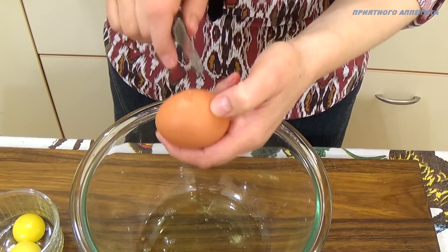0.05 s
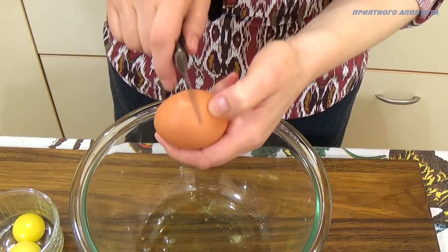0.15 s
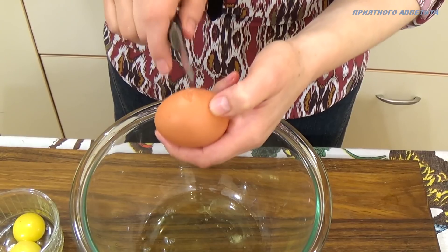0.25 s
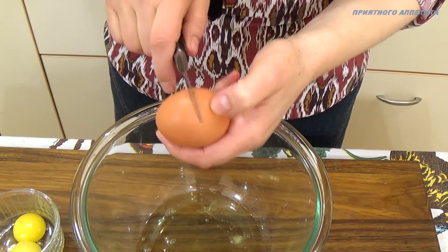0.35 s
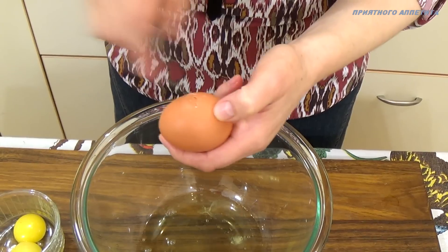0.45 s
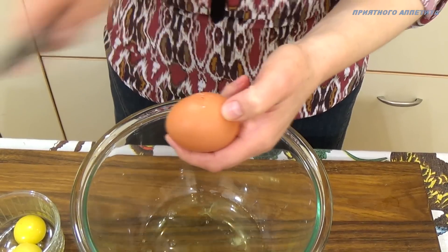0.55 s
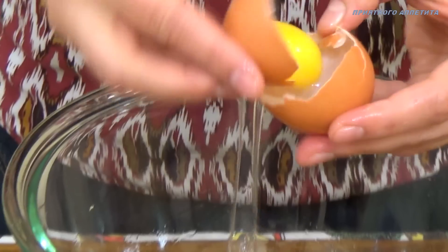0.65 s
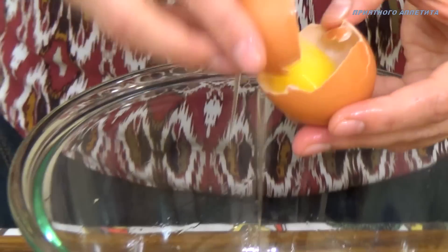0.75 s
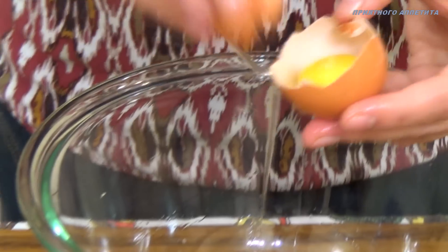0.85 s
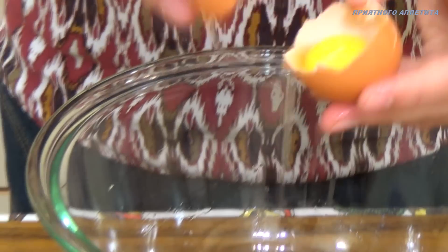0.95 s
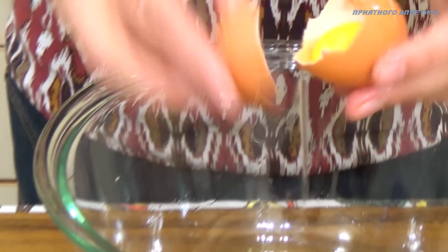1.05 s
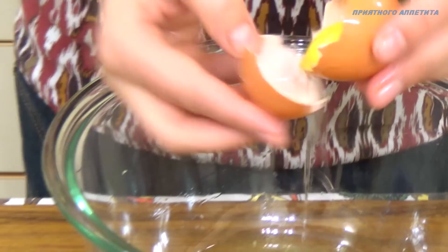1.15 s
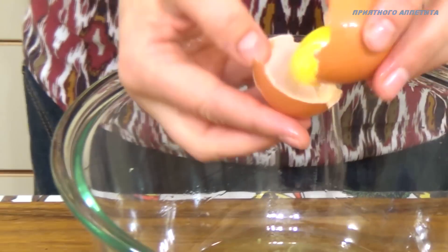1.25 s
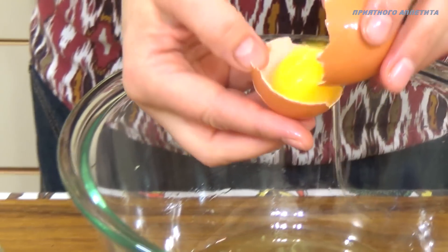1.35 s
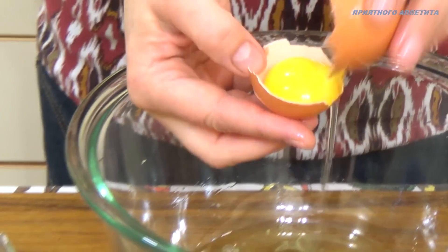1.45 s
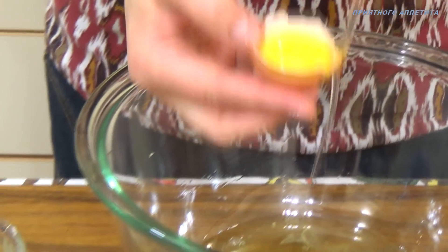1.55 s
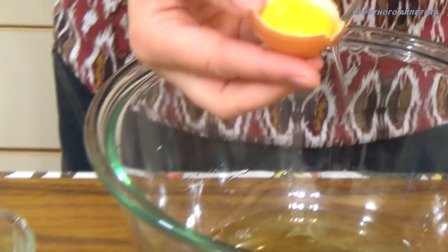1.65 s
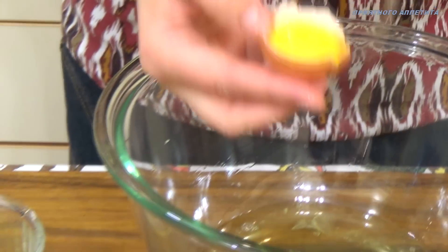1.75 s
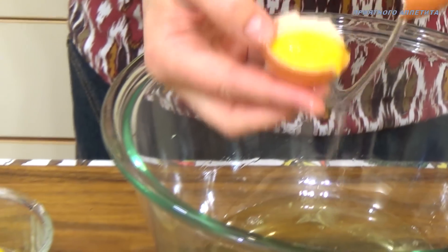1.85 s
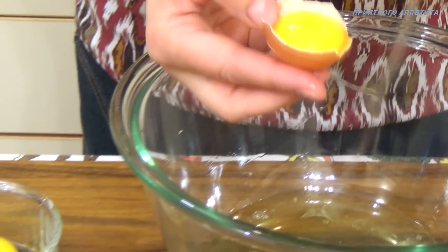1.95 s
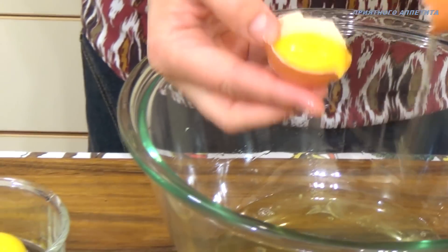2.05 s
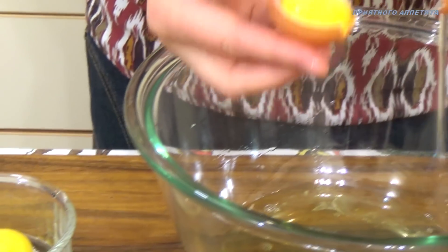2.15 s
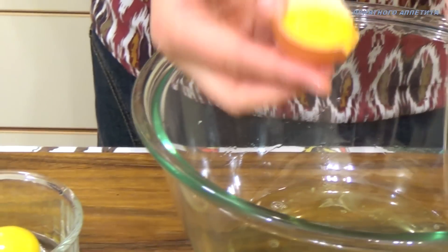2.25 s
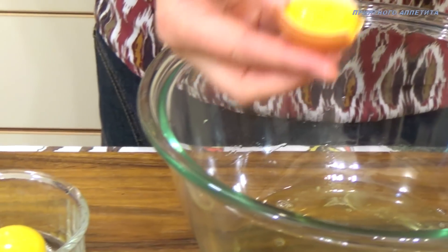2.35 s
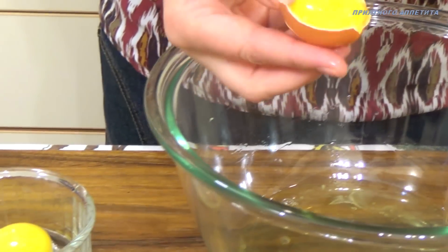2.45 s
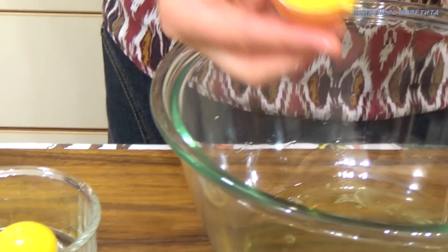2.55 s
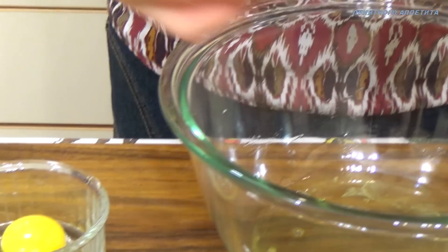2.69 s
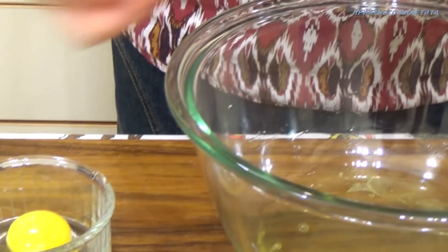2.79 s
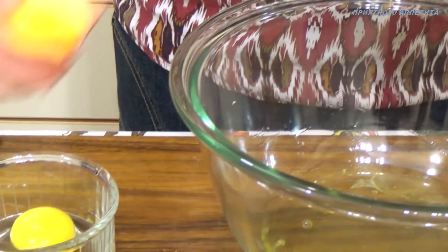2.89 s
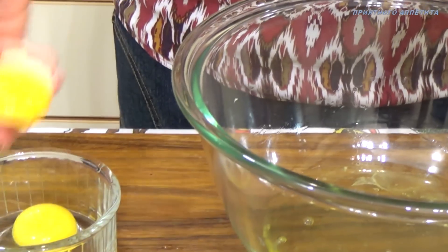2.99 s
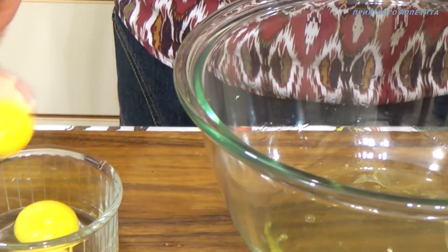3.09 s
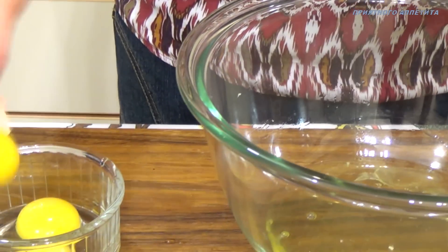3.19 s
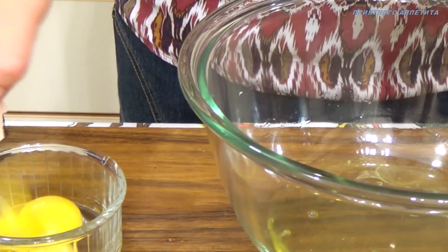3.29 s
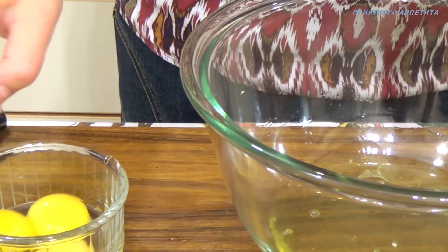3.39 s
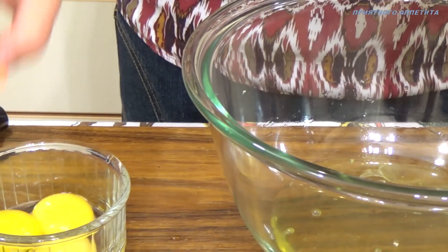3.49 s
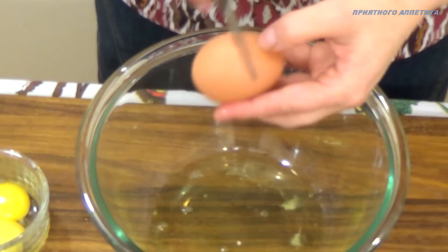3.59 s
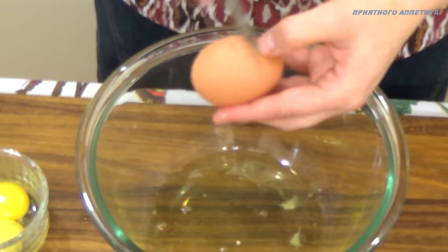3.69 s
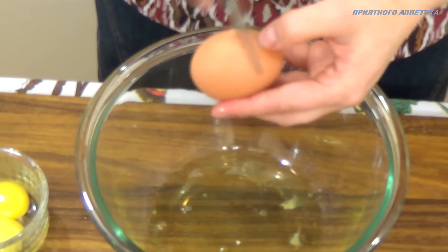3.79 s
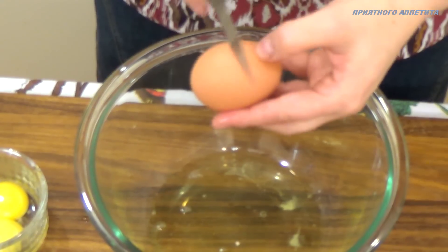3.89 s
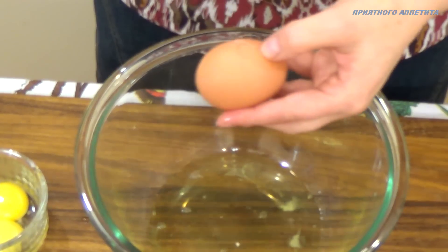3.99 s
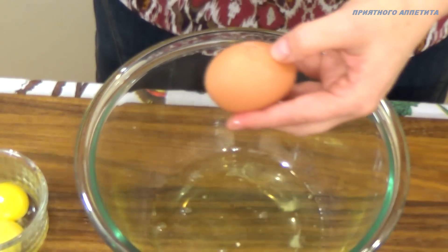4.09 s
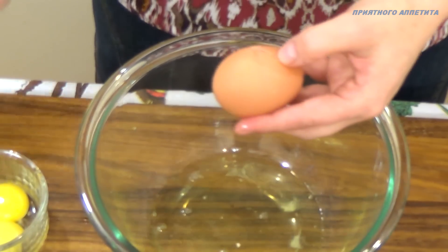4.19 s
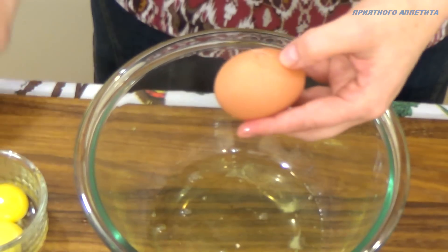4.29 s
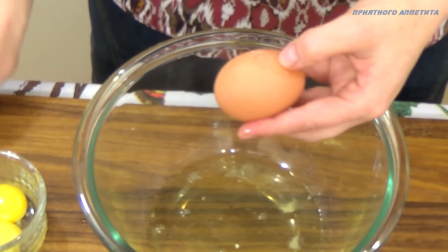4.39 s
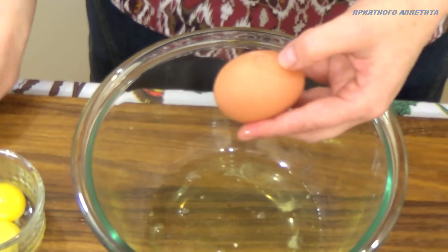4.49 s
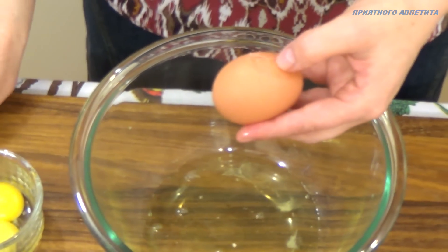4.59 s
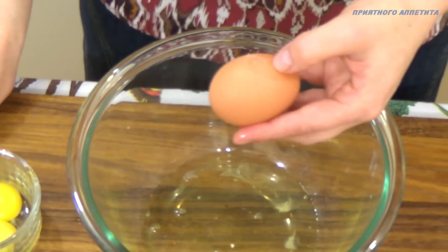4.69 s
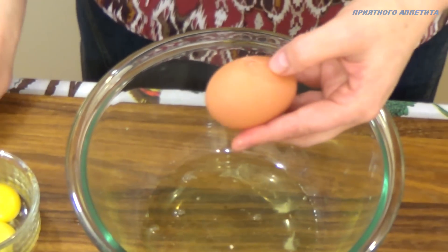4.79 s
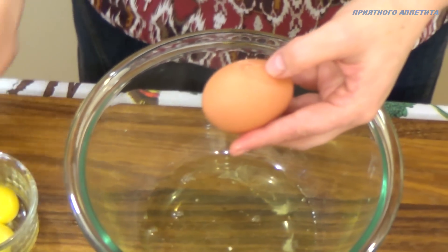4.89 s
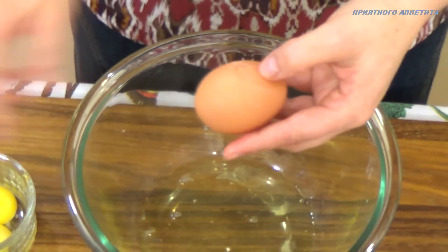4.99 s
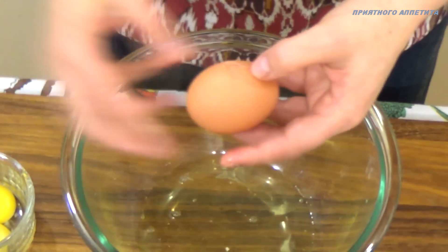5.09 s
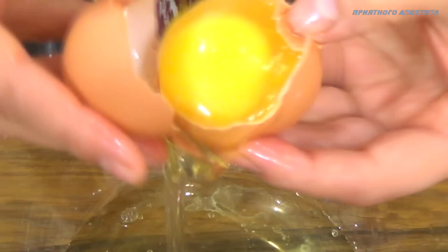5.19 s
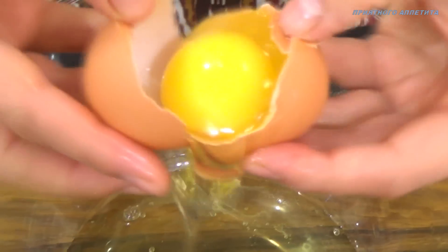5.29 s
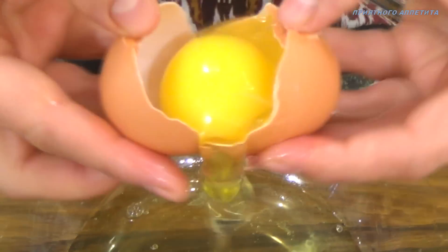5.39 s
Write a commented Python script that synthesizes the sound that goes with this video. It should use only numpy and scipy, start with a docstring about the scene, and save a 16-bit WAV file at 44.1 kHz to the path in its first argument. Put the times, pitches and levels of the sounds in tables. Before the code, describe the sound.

A knife taps raw eggshells, egg white drips into a glass bowl, and the knife clatters onto a wooden table in a small kitchen.

```python
"""Eggs are opened over a glass bowl in a small, bright kitchen, with a low hum and a thin whine throughout.
A knife taps the first shell three times, crushing it a little and making egg and blade ring.
Hands bump and rub as the yolk is kept back; egg white drips and bits of shell snap.
An empty half is put down with a ping, and the knife taps a second egg twice.
Dull knocks on wood begin, the knife clatters onto the table, more knocks follow, and the shell snaps apart."""
import sys
import numpy as np
from scipy import signal
from scipy.fft import rfft, irfft
from scipy.io import wavfile
from scipy.ndimage import uniform_filter1d

SR = 44100
rng = np.random.default_rng(int(sys.argv[2]) if len(sys.argv) > 2 else 0)


def bounce(signal):
    """Save signal as a 16-bit WAV file at the path given by the first command-line argument."""
    frames = np.transpose(np.atleast_2d(signal))
    limited = np.clip(frames, -1, 1)
    pcm = np.round(limited * 32767).astype(np.int16)
    wavfile.write(sys.argv[1], SR, pcm)


N = 240019
CLICK_SAMPLES = 4096
FREQS = np.fft.rfftfreq(CLICK_SAMPLES, 1 / SR)


def amp(db):
    """Turns decibels into a number to multiply by."""
    return 10 ** (np.asarray(db) / 20)


def curve(points, hz, column=1):
    """Reads a table column at any pitch, joining its rows with straight lines over log frequency."""
    table = np.array(points, float)
    return np.interp(np.log(hz + 1), np.log(table[:, 0] + 1), table[:, column])


def add(mix, start_s, sound):
    """Adds a sound into the mix at a given time."""
    part = mix[max(round(start_s * SR), 0):][:len(sound)]
    part += sound[:len(part)]


def click(spectrum_db):
    """A click that starts sharply and has the given level at each frequency."""
    mirrored_db = np.r_[spectrum_db, spectrum_db[-2:0:-1]]
    log_gain = np.log(amp(np.maximum(mirrored_db, -100)))
    spectrum = np.exp(np.conj(signal.hilbert(log_gain)))
    return irfft(spectrum[:len(spectrum_db)])


def ring(tones):
    """Fading tones from rows of (pitch_hz, width_hz, peak_db); a wider tone dies sooner."""
    t = np.arange(SR // 4) / SR
    out = np.zeros(len(t))
    for hz, width_hz, peak_db in tones:
        fade = amp(peak_db) * 2 * np.pi * width_hz / SR * np.exp(-np.pi * width_hz * t)
        # small things give off almost no bass
        bass_cut = signal.butter(4, min(0.69 * hz, SR / 4), "high", fs=SR, output="sos")
        out += signal.sosfilt(bass_cut, fade * np.sin(2 * np.pi * hz * t))
    return out


def burst(sound, length_s, count):
    """Plays a sound as a quick run of tiny hits, keeping about the same energy and tone."""
    places = (np.arange(count) + rng.random(count)) / count
    sizes = rng.choice([-1., 1.], count) * rng.uniform(0.83, 1, count)
    hits = np.zeros(CLICK_SAMPLES)
    np.add.at(hits, (places * min(length_s, .04) * SR).astype(int), sizes)
    power = uniform_filter1d(abs(rfft(hits)) ** 2, int(CLICK_SAMPLES / (length_s * SR)) + 1)
    even_hits = signal.fftconvolve(hits, click(-10 * np.log10(power + 1e-9)))[:CLICK_SAMPLES]
    return signal.fftconvolve(even_hits, sound)


def treble_loss(cutoff_hz, steepness):
    """A hit that takes time loses its high notes; gives that loss in dB."""
    return -10 * np.log10(1 + (FREQS / cutoff_hz) ** steepness)


# tone of the hum and hiss: frequency_hz, relative_db
HUM_TONE = [(15, -27), (25, -16), (58, -8.5), (87, -14.5), (112, -10), (121, 2), (131, -7), (158, -7),
            (177, 1.5), (200, -8), (373, -8.5), (489, -11.5), (695, -11), (1330, -17), (1560, -17.5),
            (14000, -27)]
# how wide the hum spreads between the ears: frequency_hz, side_vs_middle_db
HUM_SPREAD = [(100, -24), (500, -3), (2000, 0), (5000, -5), (10000, -26)]
# an electrical whine, with weaker tones beside it from the mains: pitch_hz, level_db
WHINE_TONES = [(15525, -77), (15575, -73), (15625, -62), (15675, -73), (15725, -77)]

def background(hum_db=-56.5):
    """The room hums under a faint hiss and a steady, high electrical whine."""
    hz, t = np.fft.rfftfreq(N, 1 / SR), np.arange(N) / SR
    noise = rfft(rng.standard_normal((2, N))) * amp(curve(HUM_TONE, np.minimum(hz, 12000)))
    noise[1] *= amp(curve(HUM_SPREAD, hz))
    middle, side = irfft(noise, N)
    hum = amp(hum_db) * np.array([middle + side, middle - side]) / middle.std()
    whine = sum(amp(db) * np.sqrt(2) * np.cos(2 * np.pi * pitch * t) for pitch, db in WHINE_TONES)
    return hum + whine


# tone of splitting shell, also used for the other hard clicks: frequency_hz, relative_db
CRACK_TONE = [(100, -21), (600, -17.5), (1300, -9), (1800, -6.5), (3200, -6), (4300, -7), (6000, -0.5),
              (8200, -2.5), (10500, 0.5), (13000, -2), (16000, -9)]
# the ringing blade: pitch_hz, width_hz, relative_db
BLADE_TONES = [(1559, 16, 8), (2423, 59, 2.5), (2530, 220, -3)]
# the egg ringing in the hand: pitch_multiple, width_hz, relative_db
EGG_TONES = [(1, 147, -1.5), (1.15, 149, -4), (1.35, 143, -5.5), (2.2, 200, -10), (.3, 101, -19),
             (.62, 124, -11)]
# knife on shell: start_s, crack_db, tilt_db_per_octave, knock_db, pitch_hz, blunt_0_to_1, direct_db
KNIFE_TAPS = [(0.0144, 6, -5, 18.5, 975, 0.26, -14), (0.1932, 9, -2.5, 14, 800, 0.05, 2),
              (0.4077, 7, -4, 9, 743, 0.2, 4.5), (3.6696, 7.5, 0, 22, 810, .97, -0.4),
              (3.8818, 6.5, 1.5, 18, 770, 0.75, .3)]

def knife_taps(cupped_hand_db=3):
    """The blade crushes the shell in many tiny breaks, and the push rings egg, shell and blade."""
    direct, room = np.zeros(N), np.zeros((2, N))
    for start_s, crack_db, tilt_db, knock_db, pitch_hz, blunt, direct_db in KNIFE_TAPS:
        crack, knock = np.zeros((2, N))
        # a blunter blow makes a shorter, duller crack
        length_s = .0046 - .0014 * blunt
        tone_db = curve(CRACK_TONE, FREQS) + tilt_db * np.log2(np.maximum(FREQS, 1000) / 5000)
        tone_db += treble_loss(14240 - 3000 * blunt, steepness=11)
        add(crack, start_s, burst(click(crack_db + tone_db), length_s, count=40))
        # it also rings the blade less, the shell more, and the egg's high tones less
        blade = amp(crack_db - 0.5 - 6.5 * blunt) * ring(BLADE_TONES)
        shell = ring([(6200, 1100, crack_db - 6.5 + 8 * blunt)])
        egg = ring([(multiple * pitch_hz, width, knock_db + db - 44 * blunt * np.log2(max(multiple, 1)))
                    for multiple, width, db in EGG_TONES])
        gives_way_s = start_s + length_s / 2
        add(crack, gives_way_s, blade + shell)
        add(knock, gives_way_s, egg)
        # the cupped hand aims the knock at the listener
        direct += amp(direct_db) * (crack + amp(cupped_hand_db) * knock)
        room += kitchen_reverb(crack + knock)  # the hand moves, so each tap has its own echoes
    return with_echoes(direct) + room


# first echoes off the table and cupboards: delay_s, relative_db
FIRST_ECHOES = [(.0021, -22.5), (.0098, -20.5), (0.0188, -22)]

def with_echoes(sound):
    """The sound plus its first few bounces off nearby surfaces."""
    out = sound.copy()
    for delay_s, db in FIRST_ECHOES:
        add(out, delay_s, amp(db) * sound)
    return out


# the kitchen's echo: frequency_hz, fade_s, level_db, side_vs_middle_db, left_vs_right_db
KITCHEN_BANDS = [(116, 0.81, -0.5, -28, -1), (388, 0.42, 4, -13, 1.3), (960, 0.36, 1, -7, 2.5),
                 (2230, 0.44, 2, -5.5, 1), (5900, 0.38, -4, -5.5, -.4), (9000, 0.33, -3.5, -10, 0),
                 (14900, 0.25, -12, -38, 0.5)]

def kitchen_reverb(sound, gap_s=0.00037, build_s=0.0019, echoes_per_s=5000):
    """Crowded echoes swell after a short gap; each band then drops 60 dB in its own fade_s."""
    t = np.arange(SR * 3 // 4) / SR
    echoes = rng.choice([-1., 1.], (2, len(t))) * (rng.random((2, len(t))) < echoes_per_s / SR)
    swell = 1 - np.exp(-np.maximum(t - gap_s, 0) / build_s)
    hz, time_s, bands = signal.stft(echoes / echoes.std() * swell, SR, nperseg=256)
    fade_s, level_db, side_db, left_db = (curve(KITCHEN_BANDS, hz, k)[:, None] for k in (1, 2, 3, 4))
    fade_rate = np.log(1000) / fade_s
    bands *= np.exp(-fade_rate * time_s) * np.sqrt(2 * fade_rate / SR) * amp(level_db)
    lean_left = np.tanh(np.log(amp(left_db)) / 2)
    bands[1] = amp(side_db) * bands[1] + lean_left * bands[0]  # row 0 is the middle, row 1 the side
    tail = signal.istft(bands, SR, nperseg=256)[1]
    middle, side = signal.oaconvolve(sound[None], tail, axes=1)[:, :N]
    return np.array([middle + side, middle - side])


def hand_bumps(start_s=.76, end_s=1.16, low_hz=220, high_hz=403, count=10):
    """Hands bump softly and unevenly as the yolk is passed between the shell halves."""
    out = np.zeros(N)
    for k, (late, height) in enumerate(rng.random((count, 2))):
        hz = low_hz + height * (high_hz - low_hz)
        bump_s = start_s + (k + late) / count * (end_s - start_s)
        add(out, bump_s, ring([(hz, hz / 2.1, -14)]))
    return out


# tone of skin on shell: frequency_hz, relative_db
RUB_TONE = [(300, -17), (1600, 0), (3200, -3.5), (4800, -1.5), (6200, -2), (8000, -12), (15000, -16)]
# fingers sliding: start_s, length_s, level_db
FINGER_RUBS = [(0.868, 0.071, -53), (1.863, 0.078, -56.5), (2.869, 0.076, -55.5)]

def finger_rubs():
    """Skin drags over the rough shell: a soft swell of fine grains."""
    out = np.zeros(N)
    for start_s, length_s, level_db in FINGER_RUBS:
        samples = int(length_s * SR)
        grains = rng.laplace(size=samples) * np.hanning(samples)
        add(out, start_s, amp(level_db) * signal.fftconvolve(grains, click(curve(RUB_TONE, FREQS))))
    return out


def tick(pitch_hz, width_hz, click_db):
    """A sharp click and one short ring, which has about the same energy at any width."""
    out = ring([(pitch_hz, width_hz, -10 * np.log10(width_hz / 1000))])
    add(out, 0, burst(click(click_db + curve(CRACK_TONE, FREQS)), length_s=.0008, count=6))
    return out


# egg white falling into the bowl: start_s, level_db, pitch_hz
EGG_DRIPS = [(1.2793, -19, 1590), (1.7065, -17.5, 1640), (1.8661, -13.5, 1540), (2.214, -19, 1960),
             (2.2845, -14, 1100)]

def drips(gulp_delay_s=0.00296, gulp_pitch_ratio=0.6, gulp_db=-6.5):
    """Each drop plops, then gives a lower, softer gulp as it sinks in."""
    out = np.zeros(N)
    for start_s, level_db, pitch_hz in EGG_DRIPS:
        for delay_s, hz, db in [(0, pitch_hz, 0), (gulp_delay_s, gulp_pitch_ratio * pitch_hz, gulp_db)]:
            add(out, start_s + delay_s, amp(level_db + db) * tick(hz, hz / 4.3, click_db=-26))
    return out


# shell edges snapping: start_s, level_db, pitch_hz, width_hz
SHELL_SNAPS = [(1.2994, -21.5, 8900, 1800), (1.439, -6.5, 9900, 3400), (1.4529, -3, 5670, 427),
               (5.3823, -0.5, 9700, 2400), (5.384, -12.5, 2150, 212)]

def shell_snaps():
    """Bits of shell break or touch, each with a bright tick."""
    out = np.zeros(N)
    for start_s, level_db, pitch_hz, width_hz in SHELL_SNAPS:
        add(out, start_s, amp(level_db) * tick(pitch_hz, width_hz, click_db=-13))
    return out


# the hollow shell half and the board under it: pitch_hz, width_hz, peak_db
EMPTY_SHELL_TONES = [(246, 47, -1), (630, 124, 8), (840, 130, 2.5), (1740, 610, -8), (2610, 190, 6.5),
                     (3060, 300, 6), (5340, 170, 8), (5700, 150, 15), (10840, 2700, -2)]

def shell_put_down(start_s=3.3906, click_db=-1):
    """An empty shell half lands with one hard click and pings."""
    out = np.zeros(N)
    add(out, start_s, burst(click(click_db + curve(CRACK_TONE, FREQS)), length_s=.001, count=10))
    add(out, start_s, ring(EMPTY_SHELL_TONES))
    return out


# overall tone of the wood: frequency_hz, relative_db
WOOD_TONE = [(30, -34), (80, -12.5), (140, -5), (400, -3), (700, -6), (1200, -9), (3000, -16.5)]
# the ringing wooden panel: pitch_hz, width_hz, relative_db
PANEL_TONES = [(150, 32, -14), (259, 21, -1.5), (328.5, 18, -1.5), (432, 18, -7), (541, 45, 3),
               (650, 120, -2.5), (968, 47, -3)]
# dull knocks: start_s, level_db, cutoff_hz, change_per_bounce_db
WOOD_KNOCKS = [(4.499, 8.5, 162, -3), (4.654, 9, 169, -20), (4.748, 15, 774, -18.5), (4.879, 14, 920, -3),
               (4.967, 14, 1700, -13), (4.981, 15.5, 1300, -14), (5.162, 8, 203, -9)]

def wood_knocks(contact_s=.012, bounce_s=.028, thump_db=13.5, thump_cutoff_hz=201):
    """Soft, rattling blows on wood bounce ever weaker; each blow has its own dullness, set by its cutoff."""
    wood = amp(-3) * ring(PANEL_TONES)
    add(wood, 0, click(curve(WOOD_TONE, FREQS)))
    blows = [(start_s + k * bounce_s, level_db + k * change_db, cutoff_hz, contact_s)
             for start_s, level_db, cutoff_hz, change_db in WOOD_KNOCKS for k in range(3)]
    # the table also thumps under the landing knife
    lands_s, rests_s = KNIFE_BOUNCES[0][0], KNIFE_BOUNCES[-1][0]
    blows.append((lands_s, thump_db, thump_cutoff_hz, rests_s - lands_s))
    pushes = np.zeros(N)
    for start_s, level_db, cutoff_hz, length_s in blows:
        thud = click(level_db + treble_loss(cutoff_hz, steepness=5.73))
        add(pushes, start_s, burst(thud, length_s, count=40))
    return signal.fftconvolve(pushes, wood)[:N]


# the knife ringing against the table top: pitch_hz, width_hz, relative_db
KNIFE_TONES = [(543, 11, -1.5), (637, 31, 5), (697, 35, 3), (1236, 81, -6.5), (1283, 130, -14.5),
               (1930, 150, -10.5), (2320, 440, -11.5), (2870, 190, -14), (4190, 110, -10), (4580, 280, -19),
               (4990, 350, -16)]
# the knife bouncing: start_s, level_db, tilt_db_per_octave
KNIFE_BOUNCES = [(4.5582, 17.5, 1), (4.5762, 17.5, 0.5), (4.5905, 18, -1), (4.6, 4, -2)]

def knife_clatter(contact_db=-24, chatter_s=.002):
    """The knife lands and bounces; handle and blade chatter for a moment at each touch."""
    out = np.zeros(N)
    contact = click(contact_db + curve(CRACK_TONE, FREQS))
    for start_s, level_db, tilt_db in KNIFE_BOUNCES:
        body = ring([(hz, width, db + tilt_db * np.log2(hz / 600)) for hz, width, db in KNIFE_TONES])
        add(body, 0, contact)
        add(out, start_s, amp(level_db) * burst(body, chatter_s, count=5))
    return signal.fftconvolve(out, click(treble_loss(4700, steepness=5.3)))[:N]


def scene():
    """The egg is close and in the middle; the table sounds come slightly from the left."""
    snaps, drops, empty_shell, rubs = shell_snaps(), drips(), shell_put_down(), finger_rubs()
    knife, wood = knife_clatter(), wood_knocks()
    egg = knife_taps() + with_echoes(hand_bumps() + rubs + drops + snaps + empty_shell)
    egg_room = kitchen_reverb(rubs + amp(-13) * drops + amp(-5.5) * snaps + amp(-1.5) * empty_shell)
    lean_left = amp([[0.5], [-0.5]])
    table = lean_left * (amp(-3) * knife + amp(-2) * wood)
    table_room = kitchen_reverb(amp(-2.5) * knife + amp(0.5) * wood, gap_s=0.001, build_s=0.0006)
    return egg + egg_room + table + table_room + background()


def record(dry):
    """Cuts away the very highest treble, above 16150 Hz."""
    treble_cut = signal.firwin(511, 16150, window=("kaiser", 9), fs=SR)
    return signal.oaconvolve(dry, treble_cut[None], "same")


dry = scene()
out = record(dry)
bounce(out)
```